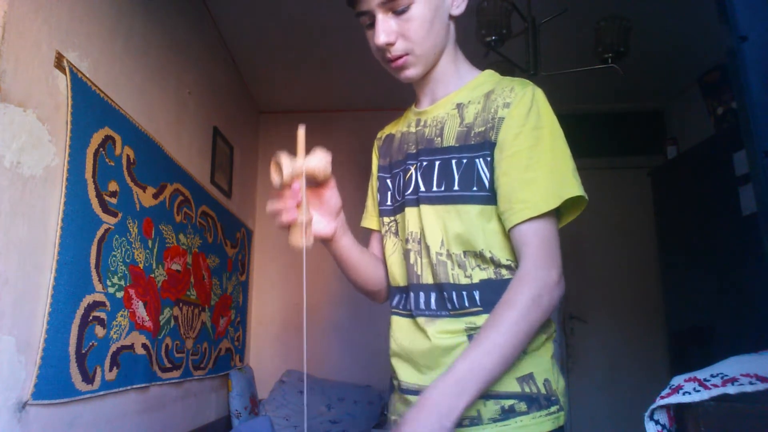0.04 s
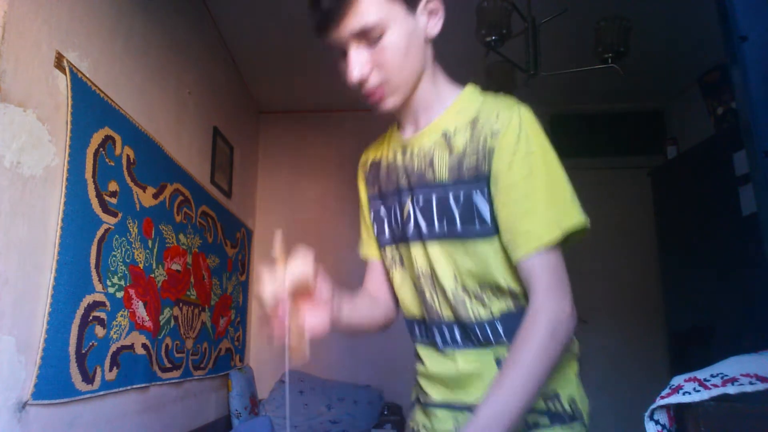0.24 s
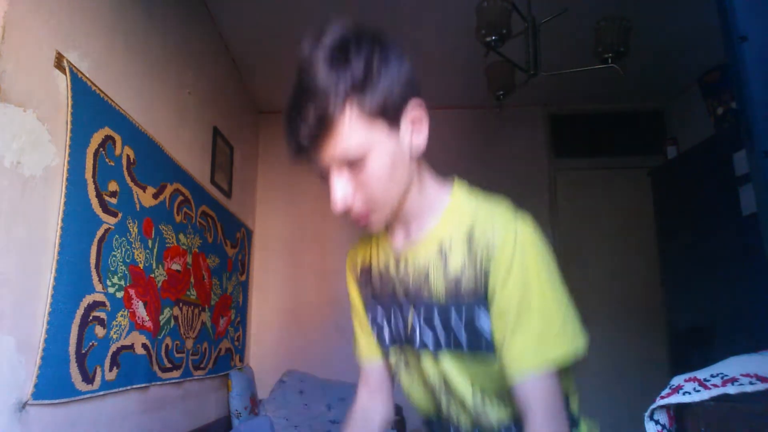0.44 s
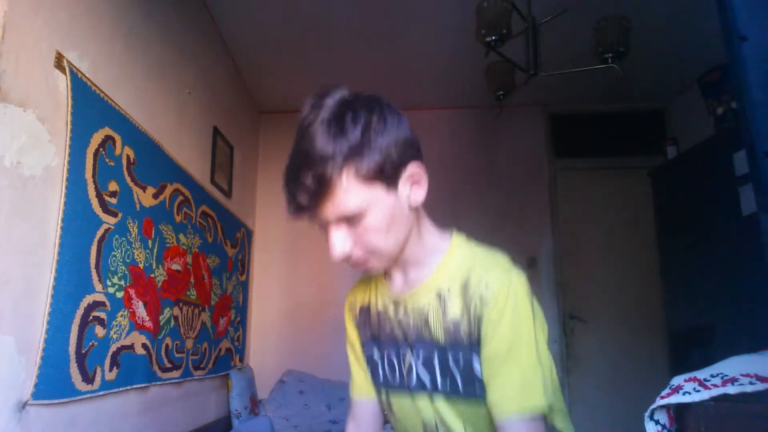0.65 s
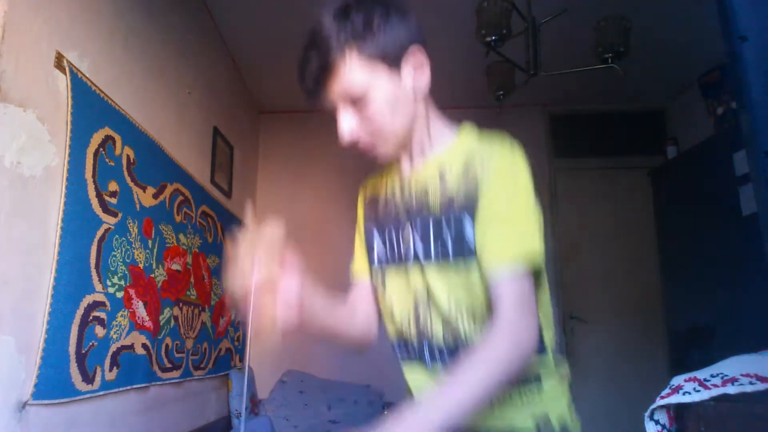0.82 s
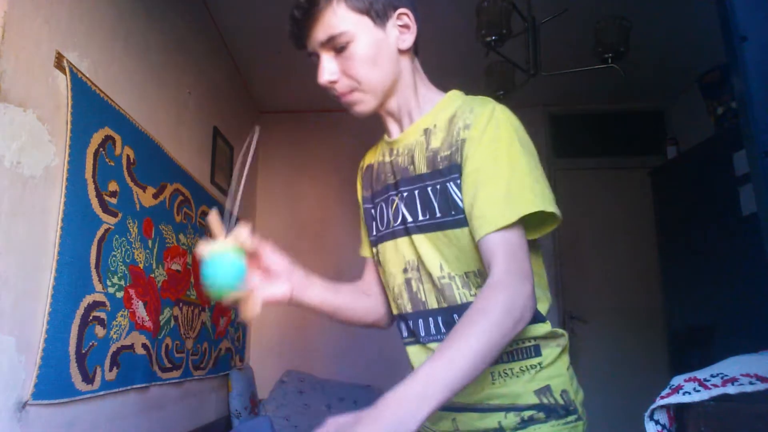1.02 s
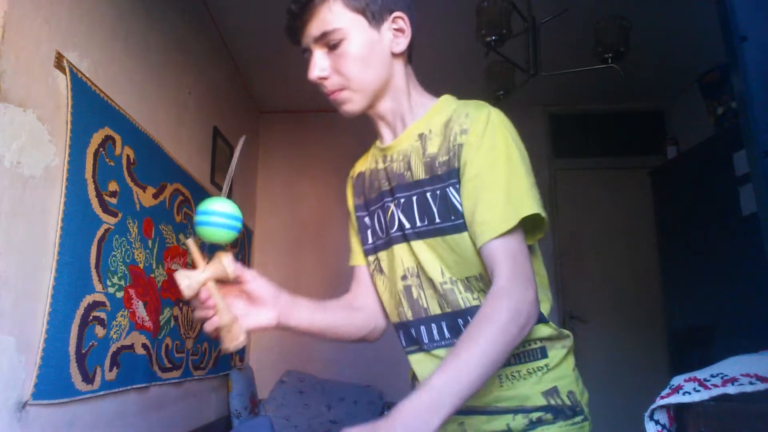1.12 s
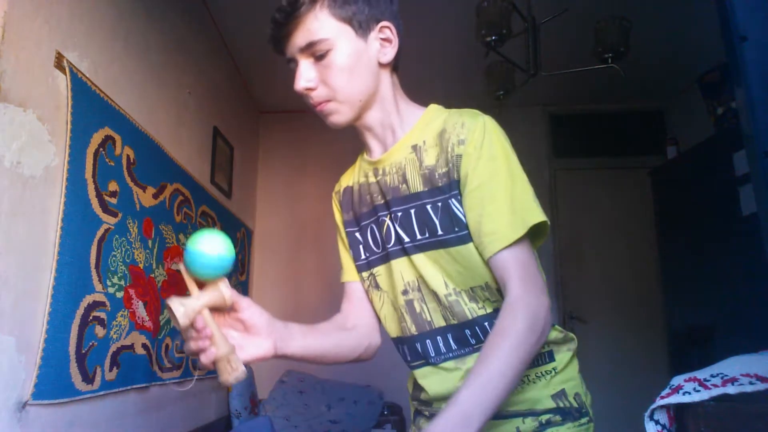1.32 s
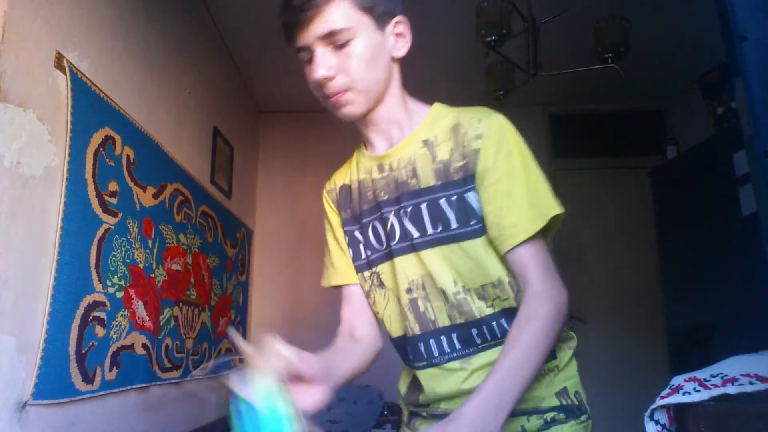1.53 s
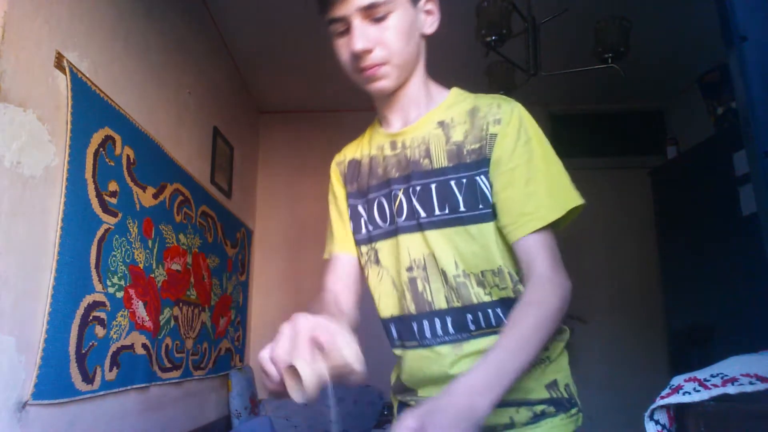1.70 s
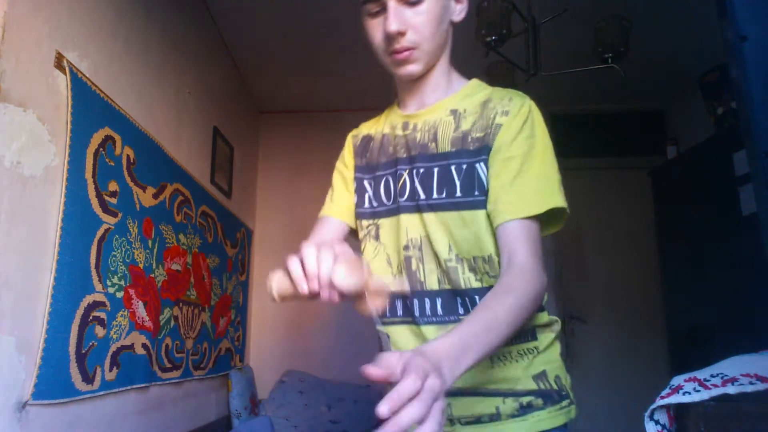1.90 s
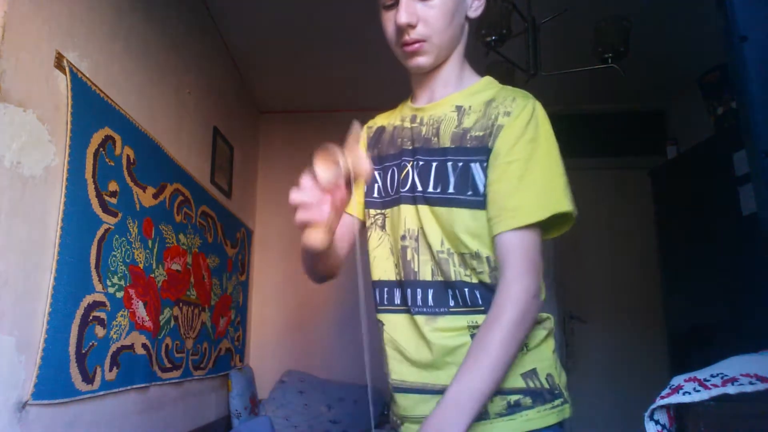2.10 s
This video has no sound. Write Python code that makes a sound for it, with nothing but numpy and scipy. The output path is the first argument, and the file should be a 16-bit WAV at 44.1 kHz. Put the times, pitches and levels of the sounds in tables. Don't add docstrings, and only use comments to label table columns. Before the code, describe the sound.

A wooden cup-and-ball toy in a small furnished room, heard by a phone about two metres away. Faint foot taps and cloth rustle lead to soft floorboard thuds at 0.3-0.5 s. The ball grazes the cup with a light click at 1.3 s, cracks loudly on the handle at 1.5 s, then drops with a duller rattle at 1.8 s. A soft step follows near 2.05 s over quiet murmur and hiss.

```python
import sys
import numpy as np
from scipy import signal
from scipy.fft import rfft, irfft, next_fast_len
from scipy.io import wavfile
from scipy.ndimage import uniform_filter1d

SR = 44100
rng = np.random.default_rng(int(sys.argv[2]) if len(sys.argv) > 2 else 0)


def to_wav(sig):
    pcm = np.clip(np.atleast_2d(sig), -1, 1) * 32767
    pcm = np.round(pcm).astype(np.int16)
    wavfile.write(sys.argv[1], SR, pcm.T)


def invert_db(x):
    u = np.asarray(x, float) / 20
    return 10 ** u


N = 94859

# [t/s, level/dB, favoured f/Hz, focus/(dB per octave squared)]
GRAZE_HITS = [(1.2872, -25.5, 4730, 38), (1.2869, -34, 840, 19), (1.2910, -32.5, 9200, 40),
              (1.2912, -22.5, 2150, 14.5), (1.2925, -42, 800, 4.5), (1.2938, -37, 4270, 23.5),
              (1.2965, -44.5, 6800, 40), (1.2966, -24, 1000, 5.5), (1.2980, -48, 9900, 30),
              (1.2990, -35.5, 3700, 15), (1.3120, -32.5, 800, -2.5)]
CRACK_HITS = [
    (1.5230, -7.5, 3500, 0.89),
    (1.5237, -18.5, 2100, 5),
    (1.5275, -23.5, 960, 28),
]
DROP_HITS = [(1.7870, -35.5, 800, 6.9), (1.7890, -44, 3300, 25), (1.7908, -30, 4900, 23),
             (1.7911, -32.5, 580, 6), (1.7924, -33, 1917, 15.5), (1.7955, -47.5, 5000, 15),
             (1.7958, -39, 1800, 22), (1.7962, -31, 470, 10.5), (1.8000, -51, 1800, 7.3),
             (1.8030, -47, 1800, 5.6), (1.8145, -36, 550, 2.8)]
BOARD_THUDS = [(.3355, -33, 700, 3), (.3392, -35, 600, 3), (.4647, -33, 450, 3), (.484, -42, 800, 5),
               (2.057, -52, 2000, 4), (.285, -55, 670, 4), (.849, -55, 150, 3), (.864, -55, 150, 3),
               (.879, -54, 550, 3)]
SOLE_TAPS = [
    (.0510, -43, 780, 2.8),
    (.0570, -55, 604, 2),
    (.0850, -66, 600, 3),
    (.4325, -46, 600, 2),
    (2.0482, -38, 484, 3),
]
# [t/s, level/dB, t60/ms]
SNAPS = [
    (1.2912, -42, 25),
    (1.2977, -52, 90),
    (1.5232, -38, 60),
    (1.790, -55, 30),
]

# [f/Hz, width/Hz, level/dB]
CUP_MODES = [(222, 110, 10), (367, 150, 3.5), (478, 194, 1.5), (714, 170, 4.5), (834, 157, 2),
             (992, 200, 5), (1580, 200, -10.5), (2150, 730, -2), (2900, 250, -13.5), (3700, 360, -12),
             (4440, 810, -9.5), (6800, 1700, -8), (8750, 1140, -14), (10130, 500, -18.5)]
HANDLE_MODES = [(480, 190, -5), (702, 98, -15), (946, 69, -9.5), (1036, 145, -8.5), (1510, 246, -5.5),
                (1757, 182, -4), (2185, 255, 0.5), (2440, 430, 5), (3170, 850, 8), (3700, 316, 8.5),
                (4080, 380, 0.5), (4496, 535, 0), (6700, 2500, 5.5), (9580, 660, 0.5)]
BALL_MODES = [(200, 180, -16), (350, 194, 4.5), (550, 170, 1), (800, 185, -4.5), (1000, 175, 0.5),
              (1560, 256, -4.5), (1800, 520, 1.5), (2150, 1200, 8.5), (3300, 710, 2), (3980, 790, 1.5),
              (4900, 660, -2), (6020, 1050, -2), (9600, 1700, -18)]
BOARD_MODES = [(151, 160, 8), (401, 99, 7), (550, 250, -22), (674, 79, 6), (790, 840, -29.5),
               (974, 41, -0.5), (1800, 250, -1.5), (2310, 470, -10)]
SOLE_MODES = [(334, 140, -8.5), (654, 320, 2), (1120, 480, -5), (1670, 440, -12), (2680, 450, -14)]

# [middle t/s, length/s, f/Hz, level/dB]
FAINT_TONES = [(-0.5, 0.26, 1063, -64), (-0.5, 0.079, 219.2, -61.5), (0.2, 0.13, 219, -58.5),
               (0.7, 0.048, 165, -64), (0.9, 0.33, 189, -72.5), (1.47, 0.086, 183, -58),
               (1.3, 0.11, 184.3, -61), (1.6, 0.037, 224, -57.5), (1.7, 0.35, 267.3, -63.5),
               (1.5, 0.083, 350, -63), (1, 0.037, 55, -53), (0.8, 0.05, 60, -56),
               (1.57, 0.029, 300, -52), (5, 0.04, 60, -73), (-2, 0.021, 75, -63.5),
               (1.6, 0.023, 270, -59.5), (2.5, 0.024, 130, -64), (1.72, 0.036, 420, -60.5),
               (.3, .7, 48, -74), (0.5, .7, 48, -75.5)]
# [t/s, level/dB]
BODY_MOVES = [(0.0, -109), (0.11, -68.5), (0.299, -59.5), (0.4, -56.5), (0.48, -55), (0.56, -60.5),
              (0.66, -65.5), (0.78, -71.5), (0.9, -62.5), (1.05, -66.5), (1.31, -79.5), (1.38, -59),
              (1.51, -73), (1.619, -52), (1.73, -65.5), (1.83, -61), (2.15, -61)]
# [t/s, level/dB]
SLEEVE_SWISHES = [(0, -86), (0.249, -85), (.45, -59.5), (.6, -63), (.74, -76), (.9, -65), (1.2, -89),
                  (1.75, -64.5), (2.15, -69.5)]

# [f/Hz, level/dB]
CLOTH_COLOUR = [(40, -9.5), (150, -4), (400, -5), (800, -6.5), (1300, -10.5), (2500, -18.5), (5000, -25),
                (15500, -28)]
SLEEVE_COLOUR = [(1000, -1), (2000, -21), (4000, 12), (8000, 14.5), (15500, 6)]
HOUSE_COLOUR = [(25, 12), (48, 12.5), (70, -1), (180, 2.5), (500, -7), (1000, -14), (2500, -16.5),
                (15500, -15.5)]

# [f/Hz, t60/s, level/dB]
ROOM_DECAY = [(196, 1, -17), (483, 0.3, 0.5), (1000, 0.38, -0.5), (1940, 0.27, 5.5), (3930, 0.28, 0.5),
              (7450, 0.27, 6), (13600, 0.25, -2)]
# [delay/ms, level/dB]
WALL_ECHOES = [(4.2, -27), (5.8, -28), (8.0, -23), (10.2, -26.5), (13.8, -23.5), (22, -34)]
# [f/Hz, shared power fraction]
PORT_LIKENESS = [(35, 0.97), (70, 0.63), (300, 0.92), (700, 0.63), (1400, 0.92), (3000, 0.14),
                 (15000, 0.017)]
# [f/Hz, delay/ms]
RIGHT_PORT_LAG = [(60, 0.32), (500, 0.026), (850, 0.014), (1200, 0.45), (3000, 0.39)]
# [f/Hz, left minus right/dB]
BODY_SHADE = [(60, -1), (110, -4), (200, -3), (380, 0), (700, 3), (1290, -3.5), (2380, -1), (4400, -5.5),
              (8120, -12.5), (15000, -4.5)]
# [f/Hz, left minus right/dB]
DIRECT_SHADE = [(500, 0), (1000, -3), (1300, 21.5), (1800, -6), (2700, -10.5), (4300, -12), (6000, -15),
                (12000, -8.5)]


def toy():
    graze = knock(GRAZE_HITS, CUP_MODES, wet_db=0.93, lag=0.2, dull_hz=10000)
    crack = knock(CRACK_HITS, HANDLE_MODES, wet_db=2.5, lag=0.03, dull_hz=9300)
    drop = knock(DROP_HITS, BALL_MODES, wet_db=3.36, lag=0.07, dull_hz=3000)
    return graze + crack + drop


def knock(contacts, modes, wet_db, lag, dull_hz):
    rise_cycles, rise_ms, room_db = 0.35, 0.17, 1
    length = 2048
    dry = np.zeros(N + length)
    hz, width, db = np.array(modes, float).T[:, :, None]
    sign = (-1.0) ** np.arange(len(hz))[:, None]
    luck = rng.standard_normal((len(contacts), 2 * len(modes)))
    for (s, level_db, near_hz, focus_db), r in zip(contacts, luck):
        i = int(s * SR)
        t = np.maximum(np.arange(length) - (s * SR - i), 0) / SR
        weight = invert_db(db + r[::2, None] - abs(focus_db) * np.log2(hz / near_hz) ** 2)
        rise = (1 - np.exp(-t / (rise_cycles / hz + rise_ms / 1000))) ** 2
        shape = np.exp(-np.pi * width * t) * rise
        tone = np.sin(2 * np.pi * hz * (1 + 0.01 * r[1::2, None]) * t)
        hit = np.sum(weight * sign * shape * tone, 0)
        dry[i:i + length] += invert_db(level_db) * hit / np.abs(hit).max()
    dry = dry[:N]
    far = signal.lfilter(*signal.butter(1, dull_hz, fs=SR), dry)
    direct = ports(dry, shadow=0.77, lag=lag, shade=DIRECT_SHADE)
    reverb = signal.fftconvolve(far[None], room(), axes=1)[:, :N]
    return direct + invert_db(room_db + wet_db) * reverb


def splinters():
    t = np.arange(N) / SR
    env = sum(invert_db(db - 60000 * np.maximum(t - s, 0) / ms) * (t > s) for s, db, ms in SNAPS)
    bright = signal.butter(2, 8100, "high", fs=SR, output="sos")
    hiss = signal.sosfilt(bright, rng.standard_normal((3, N)))
    return ports(*(env * hiss))


def feet():
    thuds = knock(BOARD_THUDS, BOARD_MODES, wet_db=0.51, lag=0.8, dull_hz=2980)
    taps = knock(SOLE_TAPS, SOLE_MODES, wet_db=3, lag=0.91, dull_hz=3000)
    return thuds + taps


def rustle():
    grains_per_s, grain_spread_db, cloth_db, sleeve_db = 4000, 9, 2, -3.5
    struck = rng.random((3, N)) < grains_per_s / SR
    grains = struck * invert_db(grain_spread_db * np.minimum(rng.exponential(size=(3, N)), 2.5))
    src = rng.standard_normal((3, N)) * (1.9 + uniform_filter1d(grains, size=64) * 1.4)
    t = np.arange(N) / SR
    move = np.interp(t, *np.array(BODY_MOVES).T)
    swish = np.interp(t, *np.array(SLEEVE_SWISHES).T)
    cloth = ports(*bands(CLOTH_COLOUR, 1, 2.58, src)) * invert_db(cloth_db + move)
    sleeves = ports(*bands(SLEEVE_COLOUR, 0.46, 2.4, src[:, ::-1])) * invert_db(swish + sleeve_db)
    return cloth + sleeves


def hums():
    t, out = np.arange(N) / SR, 0
    for s, length, hz, db in FAINT_TONES:
        phase = 2 * np.pi * np.cumsum(hz * (1 + 0.0131 * walk(27.6))) / SR
        swell = np.exp(-((t - s) / length) ** 2 * 2)
        out = out + invert_db(db + 2 * walk(28.0)) * swell * np.sin(phase)
    return ports(out)


def house():
    return invert_db(-62) * ports(*bands(HOUSE_COLOUR, 0.73, 1.0, rng.standard_normal((3, N))))


def room():
    n, build_ms = 2 ** 15, 0.86
    t = np.arange(n) / SR
    octave = np.log2(np.maximum(np.fft.rfftfreq(n, 1 / SR), 1))
    spec = rfft(ports(*rng.standard_normal((3, n)), shadow=1.08))
    centres, tail = np.log2(np.array(ROOM_DECAY)[:, 0]), 0
    for k, (hz, t60, db) in enumerate(ROOM_DECAY):
        part = irfft(spec * np.interp(octave, centres, np.arange(len(ROOM_DECAY)) == k), n)
        tail = tail + part * invert_db(db - 60 * t / t60)
    tail = tail * (1 - np.exp(-t * 1000 / build_ms)) ** 2
    delay_ms, echo_db = np.array(WALL_ECHOES).T
    first = np.zeros(n)
    first[(delay_ms * SR / 1000).astype(int)] = invert_db(echo_db)
    early = ports(first, shadow=1.5, lag=0.094, shade=DIRECT_SHADE)
    return tail / np.sqrt(np.sum(tail ** 2) / 2) + early


def ports(common, left=None, right=None, shadow=0.69, lag=0.96, shade=BODY_SHADE):
    n = len(common)
    delay_s = lag * on_log(RIGHT_PORT_LAG, n) / 1000
    late = np.exp(-2j * np.pi * np.fft.rfftfreq(n, 1 / SR) * delay_s)
    lean = invert_db(shadow * on_log(shade, n) / 2)
    shared = rfft(common)
    pair = np.array([shared, shared * late])
    if left is not None:
        alike = np.clip(on_log(PORT_LIKENESS, n), 0, 1)
        pair = np.sqrt(alike) * pair + np.sqrt(1 - alike) * rfft(np.array([left, right]))
    return irfft(pair * np.array([lean, 1 / lean]), n)


def bands(table, wander_db, flicker_db, src):
    n = next_fast_len(N)
    octave = np.log2(np.maximum(np.fft.rfftfreq(n, 1 / SR), 1))
    spec, out = rfft(src, n) * invert_db(on_log(table, n)), 0
    for k in range(21):
        window = np.clip(1 - 2 * abs(octave - np.log2(20) - k / 2), 0, 1)
        part = irfft(spec * window, n)[:, :N]
        out = out + part * invert_db(wander_db * walk(0.89) + flicker_db * walk(26))
    return unit(out)


def walk(rate):
    k = int(SR / rate)
    return unit(uniform_filter1d(uniform_filter1d(rng.standard_normal(N), k), k))


def unit(x):
    return x / np.sqrt(np.mean(x ** 2))


def on_log(table, n, col=1):
    t = np.array(table, float)
    f = np.maximum(np.fft.rfftfreq(n, 1 / SR), 1)
    return np.interp(np.log(f), np.log(t[:, 0]), t[:, col])


def scene():
    return toy() + splinters() + feet() + rustle() + hums() + house()


def top_cut(x):
    return signal.sosfilt(signal.butter(12, 16700, fs=SR, output="sos"), x)


def record(dry):
    f = np.fft.rfftfreq(N, 1 / SR)
    peak_db = 7.5 * np.exp(-((f - 11370) / 130.0) ** 2)
    notch_db = -3 * np.exp(-((f - 8200) / 220.0) ** 2)
    top_db = -36 * np.clip((f - 15600) / 100, 0, 1)
    bass = 1 / (1 + (51.0 / np.maximum(f, 1)) ** 4)
    mix = irfft(rfft(dry) * invert_db(peak_db + notch_db + top_db) * bass, N)
    return top_cut(mix)


dry = scene()
out = record(dry)
to_wav(out)
```